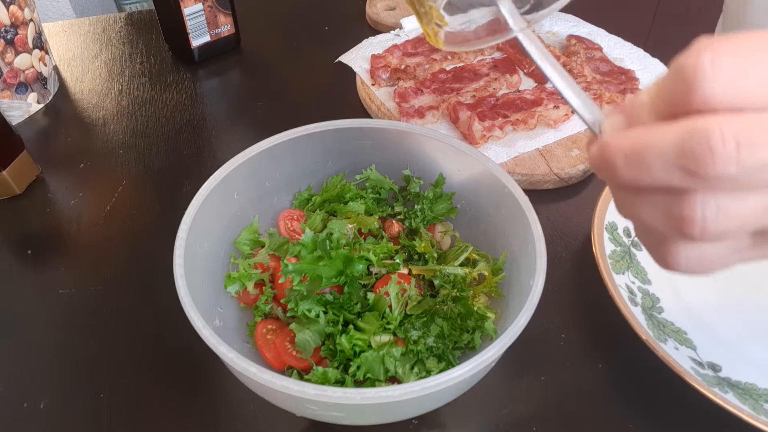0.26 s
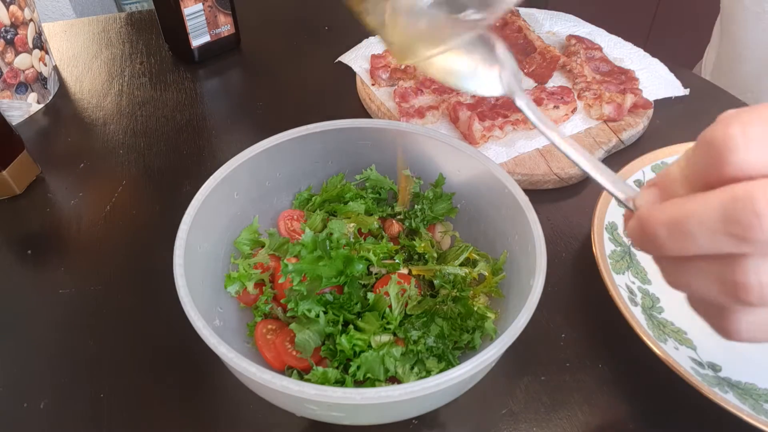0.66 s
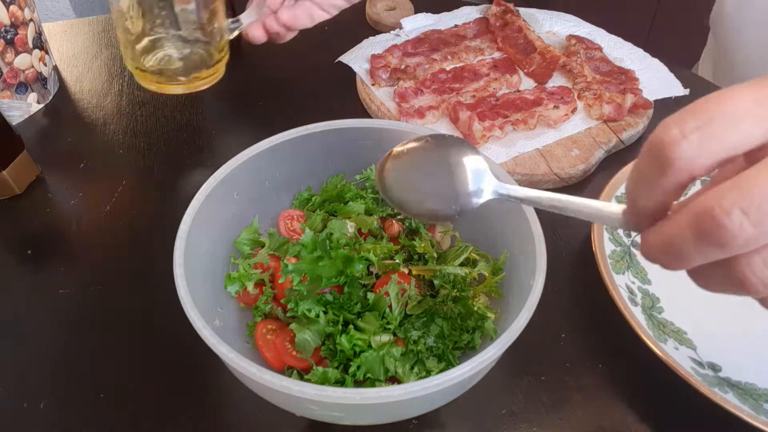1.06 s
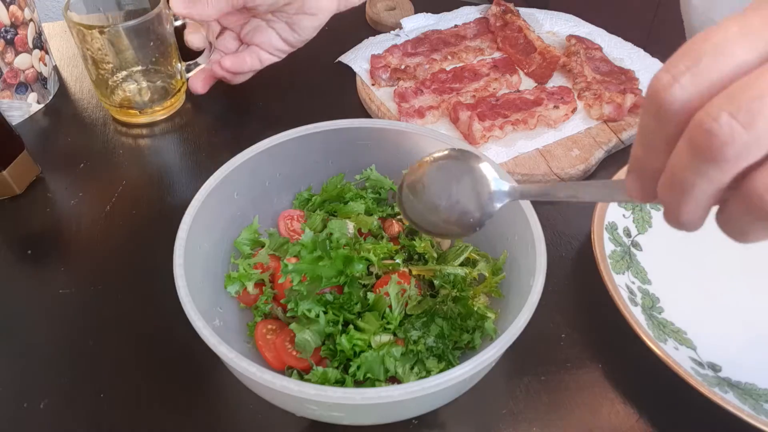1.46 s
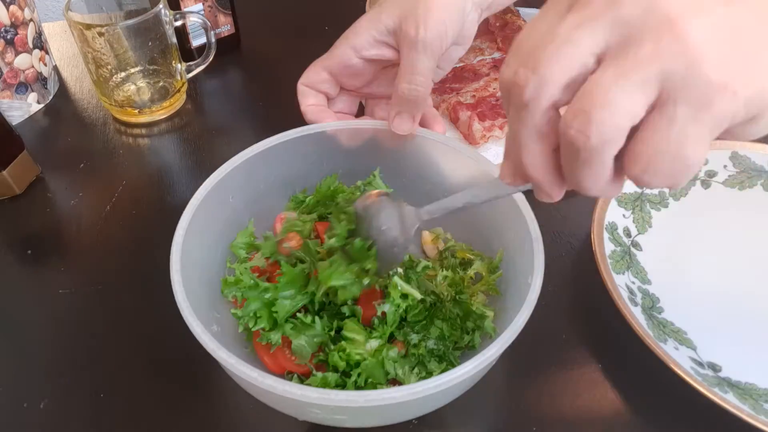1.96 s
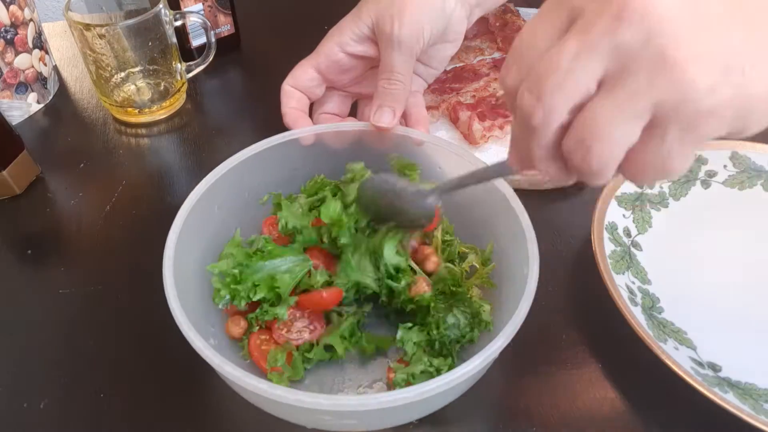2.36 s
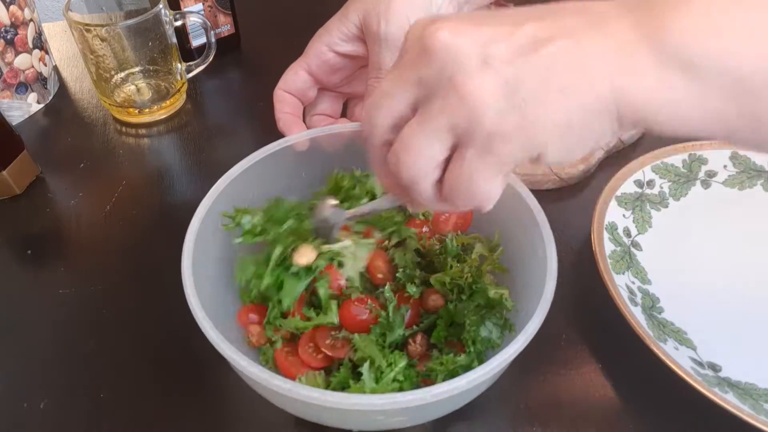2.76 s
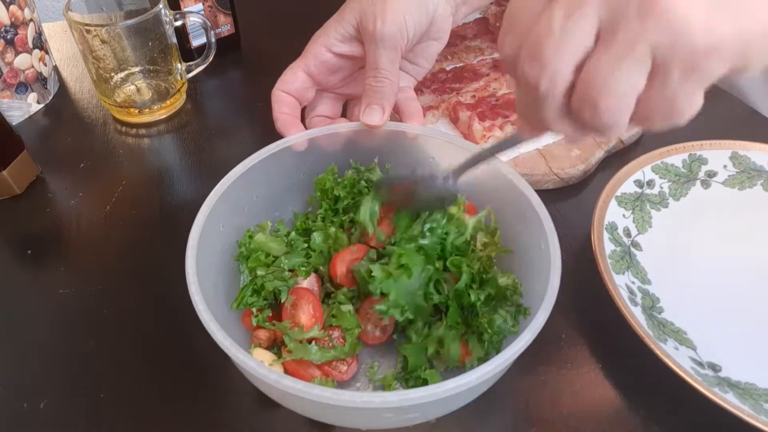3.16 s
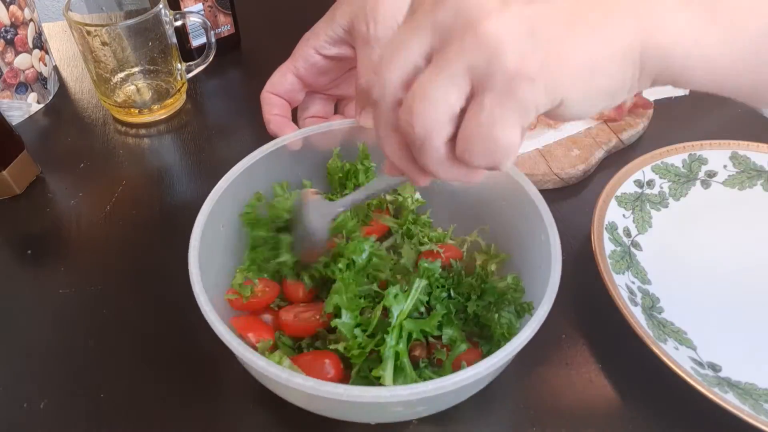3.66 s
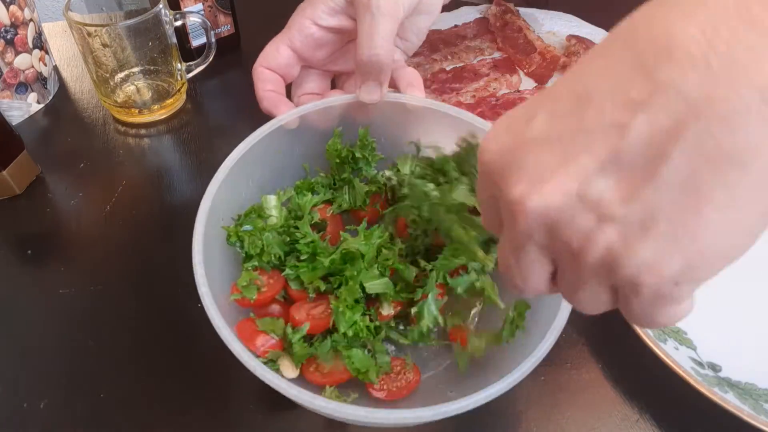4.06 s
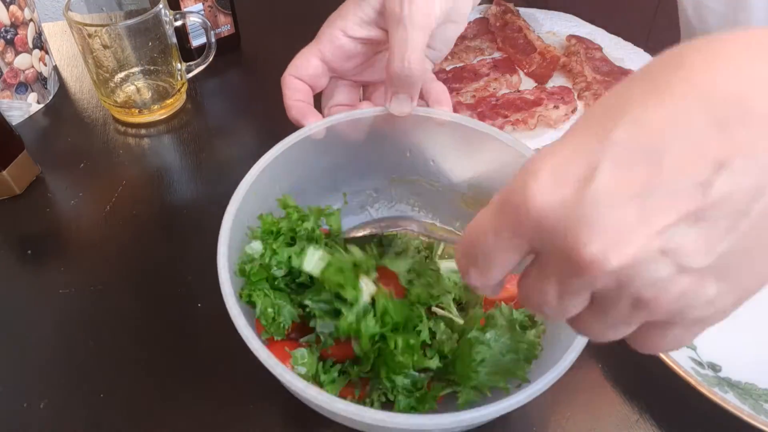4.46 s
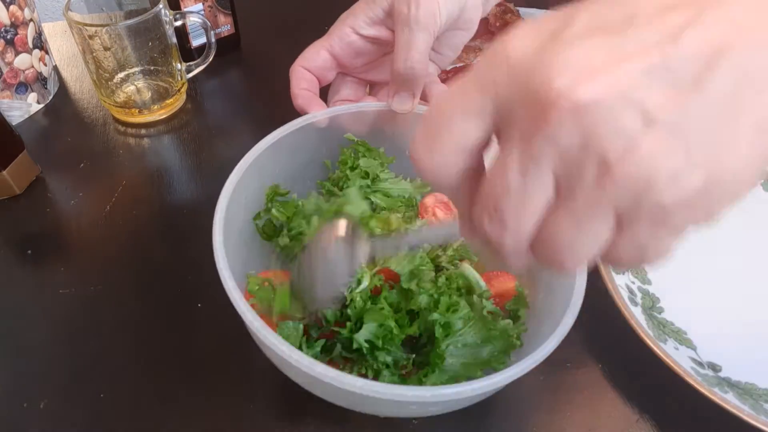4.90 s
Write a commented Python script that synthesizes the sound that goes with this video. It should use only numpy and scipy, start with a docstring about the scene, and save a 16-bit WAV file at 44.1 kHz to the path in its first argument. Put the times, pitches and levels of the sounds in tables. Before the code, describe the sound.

Rapid bright spoon taps on glass, a rocking set-down on wood, then rustling leaves with plastic knocks and soft thumps over a faint fridge hum.

```python
"""A metal spoon taps and scrapes out a small glass cup while a fridge hums and whines in a hard-walled kitchen.
A glass jug is set down on a wooden table, then the spoon tosses salad in a plastic bowl:
it knocks on the wall, the bowl thumps the table and the leaves rustle.
Blows are decaying modes plus a short crack of noise; scraping is random slips through ringing filters;
rustle, rumble and room tone are coloured noise; the fridge is a set of sine waves."""
import sys
import numpy as np
from scipy import signal
from scipy.fft import rfft, irfft
from scipy.io import wavfile

SR = 44100
rng = np.random.default_rng(int(sys.argv[2]) if len(sys.argv) > 2 else 0)


def waveform_to_disk(signal):
    """Save audio, clipped to [-1, 1], as 16-bit WAV at the path in sys.argv[1]."""
    frames = np.transpose(np.atleast_2d(signal))
    scaled = np.clip(frames, -1, 1) * 32767
    samples = np.round(scaled).astype(np.int16)
    wavfile.write(sys.argv[1], SR, samples)


def convert_level_to_amplitude(level_db):
    """Map a level in decibels to its linear amplitude factor."""
    exponent = np.asarray(level_db, float) / 20
    return 10 ** exponent


N = 226365   # length in samples
BAND_EDGES_HZ = 30 * 2 ** np.arange(0, 9.3, .5)   # half-octave bands


def rms_one(x):
    """Scale to unit rms."""
    return x / np.sqrt(np.mean(x ** 2) + 1e-20)


def in_time(points):
    """Read a (seconds, value) curve at every sample."""
    s, value = np.transpose(points)
    return np.interp(np.arange(N) / SR, s, value)


def at_hz(points, hz):
    """Read a (Hz, value) table on a log axis."""
    table_hz, value = np.transpose(points)
    return np.interp(np.log(hz), np.log(table_hz), value)


def drift(rate_hz):
    """Slow random wandering of rms 1: noise smoothed by two poles, made at every 40th sample."""
    r = np.exp(-2 * np.pi * rate_hz * 40 / SR)
    white = rng.standard_normal(N // 40 + 2002)
    slow = signal.lfilter([1], [1, -2 * r, r * r], white)[2000:]   # skip the filter's start
    return np.interp(np.arange(N) / 40, np.arange(len(slow)), rms_one(slow))


def bands(make):
    """Half-octave slices of two unrelated noises, dealt in turn, with their centres in Hz."""
    white = make(), make()
    for k, (low, high) in enumerate(zip(BAND_EDGES_HZ, BAND_EDGES_HZ[1:])):
        band = signal.butter(2, [low, high], "band", fs=SR, output="sos")
        yield np.sqrt(low * high), signal.sosfilt(band, white[k % 2])


def pair(shape, alike):
    """Stereo white noise; alike is the correlation between the two microphones."""
    mid, side = rng.standard_normal((2,) + shape)
    mid, side = np.sqrt(1 + alike) * mid, np.sqrt(1 - alike) * side
    return np.stack([mid + side, mid - side]) / np.sqrt(2)


def coloured(make, spectrum, patchy_db):
    """Colour a stereo noise to unit rms; each band flickers a little on its own."""
    return rms_one(sum(x * convert_level_to_amplitude(at_hz(spectrum, hz) + patchy_db * drift(9.8)) for hz, x in bands(make)))


def minimum_phase(gain, size):
    """Spectrum with this gain whose sound never starts before the blow (folded cepstrum)."""
    cepstrum = irfft(np.log(np.r_[gain[0], gain] + 1e-9), size)
    cepstrum[1:size // 2] *= 2
    cepstrum[size // 2 + 1:] = 0
    return np.exp(rfft(cepstrum))


SPREAD_FROM_HZ = 1200   # modes below this reach both microphones nearly in step


def blows(rows, centres_hz, modes, ring_db, spread_db, rough, wander_hz, contact_s, crack_db, crack_s, snap,
          tilt_db, edges_hz, alike, size):
    """Each blow rings every mode of the body and adds a short crack, both coloured by the blow's levels.

    A row is (start_s, a level_db at each centre, left_right_db); tilt_db is per octave about 1 kHz.
    """
    t, f = np.arange(size) / SR, np.fft.rfftfreq(size, 1 / SR)[1:]
    hz, mode_db, t60 = np.transpose(modes)[:, :, None]
    decay = convert_level_to_amplitude(-60 * t / t60) * (1 - np.exp(-t / contact_s))   # contact_s softens the start
    # grip and point of contact shift each mode from blow to blow
    shift_hz = wander_hz * rng.standard_normal((len(rows), len(modes), 1))
    # random knots, 256 samples or slightly more apart, roughen each ring
    knots = size // 256
    place = np.arange(size) * (knots - 1) / size
    left = np.arange(size) * (knots - 1) // size
    part = place % 1
    luck = rng.standard_normal((len(rows), len(modes), 2 + 2 * knots))
    cracks = pair((len(rows), 2048), alike)
    out = np.zeros((2, N + size))
    for k, row in enumerate(rows):
        colour = np.transpose([centres_hz, row[1:-1]])
        mode_hz = hz[:, 0]
        strength = convert_level_to_amplitude(at_hz(colour, mode_hz) + mode_db[:, 0] + ring_db + spread_db * luck[k, :, 0])
        # every mode reaches the two microphones at its own phase
        turn = luck[k, :, 1] * (1 - alike) * np.pi / 2 * np.minimum(mode_hz / SPREAD_FROM_HZ, 1)
        shake = 1 + rough * (luck[k, :, 2::2] + 1j * luck[k, :, 3::2])
        shake = shake[:, left] * (1 - part) + shake[:, left + 1] * part
        shaken = decay * np.exp(2j * np.pi * (hz + shift_hz[k]) * t) * shake
        ring = ((strength * np.exp(1j * np.outer([1, -1], turn))) @ shaken).imag
        cracks[:, k, 2] += snap   # the first touch is one sharp pulse
        burst = rfft(cracks[:, k] * np.exp(-t[:cracks.shape[2]] / crack_s), size)
        gain = convert_level_to_amplitude(at_hz(colour, f) + crack_db + tilt_db * np.log2(f / 1000))
        crack = irfft(burst * minimum_phase(gain, size), size)
        at = round(row[0] * SR)
        out[:, at:at + size] += (ring + crack) * convert_level_to_amplitude([[row[-1] / 2], [-row[-1] / 2]])
    band = signal.butter(3, edges_hz, "band", fs=SR, output="sos")
    return signal.sosfilt(band, out[:, :N] + 1e-18)


SKIRT_DB = -35   # however focused, a contact leaks into every octave this far below its strength


def levels(rows, colour, mid_hz, pans_db):
    """Turn strength, pitch and focus into levels over frequency: hard contacts lie high."""
    octaves = np.linspace(-2.5, 4, 66)
    hz = mid_hz * 2 ** octaves
    body_db = at_hz(colour, hz)
    filled = []
    for (s, db, pitch, focus, _), pan in zip(rows, pans_db):
        hump = convert_level_to_amplitude(-abs(focus) * (octaves - pitch) ** 2)   # only the size of focus counts
        filled.append((s, *(body_db + db + 20 * np.log10(hump + convert_level_to_amplitude(SKIRT_DB))), pan))
    return dict(centres_hz=hz, rows=filled)


# Spoon on glass: start_s, strength_db, pitch_octaves (from the middle of the spoon's range),
# focus_db_per_octave_squared (fall on both sides of the pitch), cup_ring_db (clear ring, relative)
GLASS_TAPS = [(0.0024,-18,0.53,4.5,-32), (0.0114,-17.5,0.97,2,-43), (0.0884,-45,2.5,0.5,-48),
              (0.1215,-14,0.5,2.5,-43.5), (0.2144,-11.5,0.89,4,-37), (0.2963,-42,2.5,1.6,-61.5),
              (0.3122,-31,-1,7.5,-48), (0.3123,-31.5,-0.1,2,-61.5), (0.3663,-20.5,0.72,5,-17),
              (0.452,-20.5,0.62,3,-42.5), (0.4771,-34,1,8,-43.5), (0.5266,-12.5,0.85,7,-35),
              (0.5372,-10.5,1.7,1,-26.5), (0.6499,-26.5,1,7.5,-38), (0.7006,-38.5,-0.5,-3,-63.5),
              (0.757,-33.5,0.5,2,-73.5), (0.7951,-38.5,1.4,5,-66)]
# Ringing of the glass cup: pitch_hz, level_db (relative), t60_s (time to fall 60 dB)
CUP_MODES = [(2198, 0, .22), (5132, -15, .15), (6325, -15, .12), (10462, -12, .1)]
# Ringing of the spoon: pitch_hz, level_db (relative), t60_s
SPOON_MODES = [(875, 0, .13), (960, -4, .09), (1100, -9, .04), (1500, -9, .03), (2010, -7, .1),
               (2290, -6, .06), (2440, -6, .05), (2600, -5, .06), (3063, -11, .05), (3900, -10, .03),
               (4441, -9, .04), (4985, -9, .07), (5135, -5, .08), (5735, -8, .05), (6530, -9, .05),
               (7000, -12, .04), (9964, -14, .05), (10480, -1, .08), (11700, -9, .04), (12600, -8, .05),
               (13060, -11, .05), (13880, -15, .05), (14250, -14, .04)]
# What the spoon favours: pitch_hz, level_db (relative)
SPOON_COLOUR = [(900, 1.5), (1300, -2.5), (1700, -1), (2300, 5.5), (2900, 2.5), (3600, -5), (5200, -1),
                (6400, 0), (7700, -7), (10500, 6.5), (12000, 1), (14000, 3.5)]
SPOON_MID_HZ = 2484
CUP_PAN_DB, SPOON_PAN_DB = 6, 3   # left over right


def spoon_on_glass():
    """Every tap rings two bodies at once: the clear glass cup and the rougher metal spoon."""
    cup_rows = [(s, ring_db, ring_db, CUP_PAN_DB) for s, _, _, _, ring_db in GLASS_TAPS]
    cup = blows(cup_rows, centres_hz=(950, 11000), modes=CUP_MODES,
                ring_db=-3.0, spread_db=3, rough=0.5, wander_hz=6, contact_s=0.0008,
                crack_db=-68.5, crack_s=.004, snap=0, tilt_db=-4.5,
                edges_hz=(700, 15000), alike=0.35, size=8192)
    pans_db = [SPOON_PAN_DB] * len(GLASS_TAPS)
    spoon = blows(**levels(GLASS_TAPS, SPOON_COLOUR, SPOON_MID_HZ, pans_db), modes=SPOON_MODES,
                  ring_db=-12, spread_db=4, rough=1.2, wander_hz=70, contact_s=0.00045,
                  crack_db=7.0, crack_s=0.0052, snap=1.4, tilt_db=-1.5,
                  edges_hz=(750, 14500), alike=0.29, size=5120)
    return cup + spoon


# Spoon dragging over the glass, with one last flick: start_s, level_db (relative)
SCRAPE_LEVEL = [(0, -49.5), (.115, -55), (.44, -57.5), (.5, -62), (.68, -71), (.76, -106), (.8, -49.5),
                (.83, -75), (.95, -100)]


def scrape(slips_per_s, damping, hiss_db):
    """Uneven slips of the spoon edge shake the damped modes of the spoon."""
    slips = (rng.random(N) < slips_per_s / SR) * convert_level_to_amplitude(6 * np.minimum(rng.exponential(1, N), 3))
    push = (0.24 + slips) * pair((N,), alike=0.08)
    ring = 0
    for hz, db, t60 in SPOON_MODES:
        r = convert_level_to_amplitude(-60 / (t60 * damping * SR))   # damping shortens the ring to this share
        w = 2 * np.pi * hz / SR
        ring = ring + convert_level_to_amplitude(db) * signal.lfilter([0, np.sin(w)], [1, -2 * r * np.cos(w), r * r], push)
    hiss = signal.sosfilt(signal.butter(3, [900, 14000], "band", fs=SR, output="sos"), push)
    level = convert_level_to_amplitude(in_time([*SCRAPE_LEVEL, (1.1, -120)]))
    return level * (rms_one(ring) + convert_level_to_amplitude(hiss_db) * rms_one(hiss))


# How long the kitchen rings: pitch_hz, t60_s
KITCHEN_DECAY = [(100, 0.37), (260, 0.34), (700, 0.35), (1840, 0.34), (4850, 0.3), (9000, 0.25),
                 (12800, 0.27)]


def kitchen(x, gap_s):
    """Diffuse reverberation: noise dying band by band after a short gap, unlike on each side."""
    t = np.arange(int(.9 * SR)) / SR
    noise = bands(lambda: pair(t.shape, alike=0.13))
    tail = sum(band * convert_level_to_amplitude(-60 * t / at_hz(KITCHEN_DECAY, hz)) for hz, band in noise)
    tail = tail * (1 - np.exp(-(t / gap_s) ** 2))
    tail = tail / np.sqrt(np.mean(np.sum(tail ** 2, axis=1)))
    return signal.fftconvolve(x.mean(axis=0, keepdims=True), tail, axes=1)[:, :N]


# Steady hum of the fridge motor: pitch_hz, level_db (relative)
MOTOR_LINES = [(48.5, -79.5), (96.9, -71), (193.8, -68), (247.6, -93.5), (274.5, -81)]
# Thin whine with sidebands at the motor rate: pitch_hz, level_db (relative)
WHINE_LINES = [(2942.6, -71), (2991.5, -84), (3040.4, -84), (3089.3, -81), (3138.2, -85), (3236, -92)]
# Swelling of the whine: start_s, level_db (relative)
WHINE_SWELL = [(0, 17.5), (1, 3.5), (2.2, 5.5), (3.6, 9), (4, 7.5), (4.5, 3), (5.13, 5.5)]
WHINE_LEAD_TURNS = 0.31   # the whine's phase on the right is set ahead by this share of a cycle


def fridge():
    """Steady sine waves for the motor, and a thin cluster of wavering ones for the whine."""
    t = np.arange(N) / SR
    hum = sum(convert_level_to_amplitude(db + 6.0) * np.sin(2 * np.pi * (hz * t + rng.random())) for hz, db in MOTOR_LINES)
    whine = 0
    lead = np.array([[0], [WHINE_LEAD_TURNS]])
    for hz, db in WHINE_LINES:
        level = convert_level_to_amplitude(db + 3.5 + drift(12.0))
        whine = whine + level * np.sin(2 * np.pi * (hz * t + rng.random() + lead))
    return hum + whine * convert_level_to_amplitude(in_time(WHINE_SWELL))


# Colour of the quiet room: pitch_hz, level_db (per Hz, relative)
ROOM_TONE_COLOUR = [(18, -50), (30, -20), (196, -9), (242, -16), (547, -37.5), (752, -18), (1210, -40),
                    (1700, -32), (2530, -34), (2970, -3.5), (3480, -46), (4600, -37), (6720, -43.5),
                    (15200, -39.5), (16500, -56)]
ROOM_TONE_DB = -70.5


def room_tone():
    """Steady, faintly flickering noise of the quiet room."""
    return convert_level_to_amplitude(ROOM_TONE_DB) * coloured(lambda: pair((N,), alike=0.066), ROOM_TONE_COLOUR, patchy_db=1.5)


# Colour of the rumble: pitch_hz, level_db (per Hz, relative)
RUMBLE_COLOUR = [(18, -51), (30, -31), (64, -18), (113, 8), (223, -6.5), (276, -8), (392, -27.5),
                 (600, -24), (780, -48.5), (1320, -120)]
# Hands and bowl moving on the table: start_s, level_db (relative)
SLIDE_LEVEL = [(0.0, -49.5), (0.64, -65.5), (1.15, -59.5), (1.5, -48), (1.64, -70), (2.3, -52.5),
               (2.42, -59.5), (2.83, -54.5), (3.33, -56.5), (3.52, -45), (4.23, -51), (4.59, -65.5),
               (4.96, -54), (5.13, -44)]


def rumble():
    """Hands and bowl on the table: low noise that swells and flickers."""
    noise = coloured(lambda: pair((N,), alike=0.12), RUMBLE_COLOUR, patchy_db=5.5)
    return convert_level_to_amplitude(in_time(SLIDE_LEVEL) - 2.5) * noise


# Ringing of the wooden table: pitch_hz, level_db (relative), t60_s
TABLE_MODES = [(60, -6, .1), (118, 5, .18), (277, -5, .2), (367, -6, .22), (418, -2, .2), (459, -2, .24),
               (600, -8, .2), (652, -4, .16), (701, -5, .19), (754, -11, .2), (826, -10, .16),
               (867, -6, .2), (996, -12, .15), (1087, -14, .14), (1330, -18, .12)]
# What the table favours: pitch_hz, level_db (relative)
TABLE_COLOUR = [(115, 0), (190, -3.5), (300, -5), (700, -2.2), (2000, -7.5), (5000, -12)]
TABLE_MID_HZ = 385


def table_blows(rows, modes):
    """Something landing on the wooden table: low, slightly uneven modes and a dull crack."""
    return blows(**levels(rows, TABLE_COLOUR, TABLE_MID_HZ, np.transpose(rows)[4]), modes=modes,
                 ring_db=-8, spread_db=1.5, rough=.25, wander_hz=4, contact_s=0.00042,
                 crack_db=4.5, crack_s=0.0089, snap=2.7, tilt_db=-5.0,
                 edges_hz=(70, 8000), alike=0.44, size=12288)


# Jug set down, rocking twice: start_s, strength_db, pitch_octaves (from the middle of the table's range),
# focus_db_per_octave_squared, left_right_db
JUG_BLOWS = [(0.807,-45,-1.86,3.5,0), (1.326,-11,0.7,2,2.5), (1.344,-16,0.57,1,-1), (1.372,-15.5,1,4.5,6),
             (1.399,-19.5,0.91,10,1), (1.553,-17,0.6,3.5,4.5), (1.562,-29,-1.5,4.5,4), (1.595,-20,0.24,3,0),
             (1.629,-32.5,0.38,1,6)]


def jug_on_table():
    """The jug rings the table as it is set down and rocks."""
    return table_blows(JUG_BLOWS, TABLE_MODES)


# Spoon on bowl: start_s, strength_db, pitch_octaves (from the middle of the bowl's range),
# focus_db_per_octave_squared, left_right_db
BOWL_KNOCKS = [(1.816,-35.5,0.5,2.5,0), (1.823,-28.5,-4,0,7), (1.864,-31.5,-1,1,3.5), (1.959,-43,1,3,6.5),
               (2.152,-37.5,1.2,1.5,9), (2.341,-43.5,0,3.5,7.5), (2.4456,-50,1,-4,19),
               (2.4662,-26,-0.5,1.5,0), (2.649,-50,0,4,11), (2.99,-31,4,13,13), (2.999,-16,0.5,8,7.5),
               (3.008,-26,1.6,42,-7), (3.021,-27,.5,26,6), (3.031,-29.5,3.5,-4,5.5),
               (3.037,-40.5,-1.7,19,2.5), (3.057,-38,-2.1,11,-4), (3.071,-44,-0.5,17,7),
               (3.088,-39.5,0,5.5,2), (3.162,-45,-1,20,3), (3.208,-53,-1,6,2), (3.2366,-29,-0.87,13.5,8.5),
               (3.258,-35,-1.07,5.5,3), (3.3355,-33.5,2,1.5,6.5), (3.337,-27.5,-1.3,4,9.5),
               (3.436,-39.5,0,12,9), (3.484,-28,-1.4,9.5,8.5), (3.573,-39,1.67,-1.5,8.5),
               (3.677,-44.5,-0.5,-1.5,2), (3.84,-20,2.5,-0.64,6), (3.886,-29.5,1.5,0.5,5),
               (4.092,-54,-0.8,3,10), (4.106,-52.5,-1.4,0,6), (4.342,-18.5,-0.01,10,7.5),
               (4.3408,-31,-2.5,0.5,7), (4.368,-52,1.5,12,8), (4.767,-45.5,0.7,6,0), (5.001,-56,0,7,8),
               (5.01,-25,1.5,0.37,7), (5.061,-32,.2,30,8), (5.074,-16.5,0.16,0.75,4.5)]
# Ringing of the plastic bowl: pitch_hz, level_db (relative), t60_s
BOWL_MODES = [(292, 8, .05), (520, 0, .02), (695, 6, .04), (870, 1, .03), (1045, 5, .035), (1325, 4, .018),
              (1560, 1, .02), (2035, 4, .025), (2440, 4, .022), (2640, 4, .022), (2960, 4, .02),
              (3340, 3, .018), (3760, 4, .018), (4300, 0, .015)]
# What the bowl favours: pitch_hz, level_db (relative)
BOWL_COLOUR = [(400, 4), (560, 2), (700, 4), (860, 3), (1045, 5), (1190, 1.5), (1330, 7), (1740, -4),
               (2040, 1), (2280, 1.5), (2620, 3.5), (3100, 1.5), (3800, 2), (5000, -2), (8000, -4)]
BOWL_MID_HZ = 1965


def spoon_on_bowl():
    """The spoon knocks the plastic wall: short modes and a sharp first touch."""
    pans_db = np.transpose(BOWL_KNOCKS)[4]
    return blows(**levels(BOWL_KNOCKS, BOWL_COLOUR, BOWL_MID_HZ, pans_db), modes=BOWL_MODES,
                 ring_db=-17, spread_db=3, rough=.8, wander_hz=40, contact_s=0.00046,
                 crack_db=7.5, crack_s=0.0037, snap=5.35, tilt_db=-2.0,
                 edges_hz=(250, 16000), alike=0.27, size=4096)


# Bowl landing on the table: start_s, strength_db, pitch_octaves (from the middle of the table's range),
# focus_db_per_octave_squared, left_right_db
BOWL_THUMPS = [(1.863,-26.5,-0.95,7.5,-1.5), (1.883,-35,0.1,16.5,5), (2.189,-31,-0.76,25,7),
               (2.4455,-37.5,-0.5,2.5,-0.5), (2.81,-44,-2,4.5,-4), (3.043,-44.5,-1.6,11,4),
               (3.342,-32.5,0.04,3.5,-0.5), (3.617,-37,-0.86,11.5,12), (3.699,-43,-4.5,1.5,22),
               (3.841,-31.5,-0.64,5.5,-0.5), (3.886,-42,-1.1,16,0), (4.299,-39,-1.44,22,0),
               (4.34,-36,0,10,2), (4.765,-39,-0.23,13.5,-3), (5.074,-25,.2,8,0), (5.085,-22,-.5,18,-1)]
# The bowl's bottom booms when it lands: pitch_hz, level_db (relative), t60_s
BOWL_FOOT_MODES = [(275, 9, .24)]


def bowl_on_table():
    """The landing bowl rings the table and its own booming bottom."""
    return table_blows(BOWL_THUMPS, [*TABLE_MODES, *BOWL_FOOT_MODES])


# Strokes of the spoon through the leaves: start_s (at full rustle), level_db, hold_s, fall_db_per_s
LEAF_STROKES = [(1.883, -54, 0.05, 166), (2.176, -53.5, 0.072, 107), (2.455, -55, 0.099, 121),
                (2.77, -47.5, 0.0074, 84), (3.005, -50, 0.051, 98), (3.356, -49.5, 0.065, 105),
                (3.646, -49.5, 0.016, 131), (3.897, -50, 0.012, 145), (4, -54, 0.017, 49.5),
                (4.183, -59.5, 0.23, 54.5), (4.759, -51.5, 0.014, 85), (5.034, -64, 0.027, 54),
                (5.125, -51, .03, 60)]
STROKE_RISE_DB_PER_S = 227
# a blow on the table shakes the leaves, this far below its strength
SHAKE_DB, SHAKE_RISE_S, SHAKE_FALL_DB_PER_S = -57.5, 0.012, 85.5


def tossing():
    """Rustle in dB: each stroke swells, holds and dies away; blows on the table stir the leaves a little."""
    t = np.arange(0, N, 64) / SR
    rows = [(s, db, hold, STROKE_RISE_DB_PER_S, fall) for s, db, hold, fall in LEAF_STROKES]
    for s, db, *_ in [*JUG_BLOWS, *BOWL_THUMPS]:
        rows.append((s + SHAKE_RISE_S, db + SHAKE_DB, 0, 20 / SHAKE_RISE_S, SHAKE_FALL_DB_PER_S))
    power = 1e-14
    for s, db, hold, rise, fall in rows:
        level_db = db - rise * np.maximum(s - t, 0) - fall * np.maximum(t - s - hold, 0)
        power = power + convert_level_to_amplitude(level_db) ** 2
    return np.interp(np.arange(N) / SR, t, 10 * np.log10(power))


# Colour of the rustling: pitch_hz, level_db (per Hz, relative)
LEAF_COLOUR = [(290, -10.5), (500, -5), (1150, -2), (1480, -4), (1730, 5.5), (3020, -0.5), (3600, 4.5),
               (12900, 0.5), (15800, -17.5), (16500, -34)]


def leaves(rustle_db, snaps_per_s, sizes_db, smooth):
    """Crisp leaves: dense tiny snaps over a smooth brushing hiss."""
    sizes = convert_level_to_amplitude(sizes_db * np.minimum(rng.exponential(1, N), 5))
    snaps = (rng.random(N) < snaps_per_s / SR) * sizes
    grain = smooth + rms_one(snaps)
    return convert_level_to_amplitude(rustle_db) * coloured(lambda: grain * pair((N,), alike=0.033), LEAF_COLOUR, patchy_db=1.5)


def scene():
    """Blows share the room; scraping, leaves, rumble, room tone and fridge are added without its echo."""
    glass = spoon_on_glass()
    drag = scrape(slips_per_s=800, damping=0.45, hiss_db=2.5)
    table = jug_on_table() + bowl_on_table()
    bowl = spoon_on_bowl()
    echo = kitchen(convert_level_to_amplitude(-6.0) * glass + convert_level_to_amplitude(-3.0) * bowl + convert_level_to_amplitude(-4.5) * table, gap_s=0.00028)
    echo = echo * convert_level_to_amplitude([[1.2], [-1.3]])   # a little stronger on the left, in dB
    rustle = leaves(tossing(), snaps_per_s=1200, sizes_db=1.6, smooth=1.8)
    rustle = rustle * convert_level_to_amplitude([[1.2], [-1.2]])
    return glass + drag + bowl + table + echo + rustle + rumble() + room_tone() + fridge()


def band_limit(x):
    """A steep low-pass at the top of the band."""
    return signal.sosfilt(signal.butter(12, 16860, fs=SR, output="sos"), x)


RIGHT_LAG_S = .00016   # the right microphone is further from the table
TOP_HZ = 16000         # almost nothing is heard above this


def record(dry):
    """Two close microphones hear the same bass, the right one less of it; deep bass is lost."""
    late = np.r_[np.zeros(round(RIGHT_LAG_S * SR)), dry[1]][:N]
    mid, side = (dry[0] + late) / 2, (dry[0] - late) / 2
    side = signal.sosfilt(signal.butter(1, 480, "high", fs=SR, output="sos"), side)
    deep_cut = signal.butter(2, 42, "high", fs=SR, output="sos")
    left, right = signal.sosfilt(deep_cut, [mid + side, mid - side])
    right = right - .7 * signal.sosfilt(signal.butter(1, 170, fs=SR, output="sos"), right)
    limited = 0.97 * np.tanh(np.stack([left, right]) / 0.94)   # loud peaks are rounded off
    top = signal.cheby2(10, 26, TOP_HZ, fs=SR, output="sos")
    return band_limit(signal.sosfilt(top, limited))


dry = scene()
out = record(dry)
waveform_to_disk(out)
```